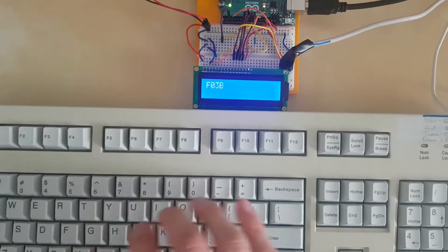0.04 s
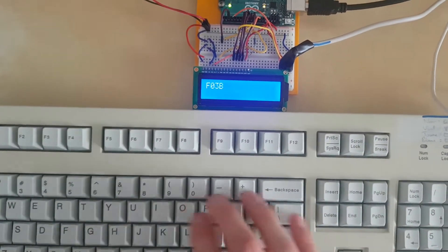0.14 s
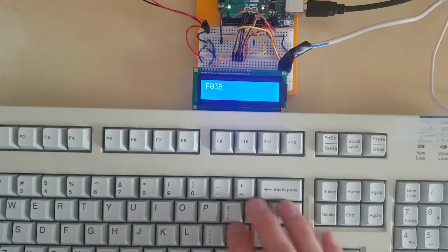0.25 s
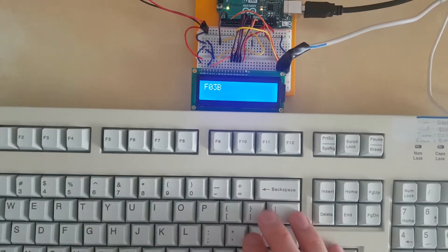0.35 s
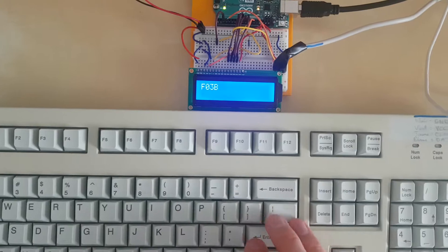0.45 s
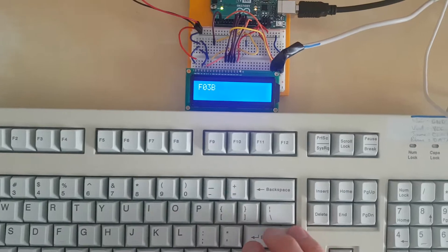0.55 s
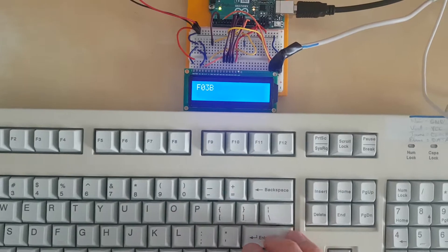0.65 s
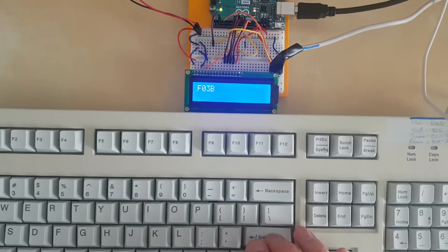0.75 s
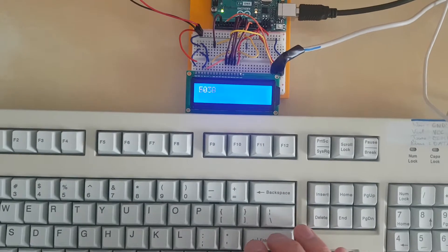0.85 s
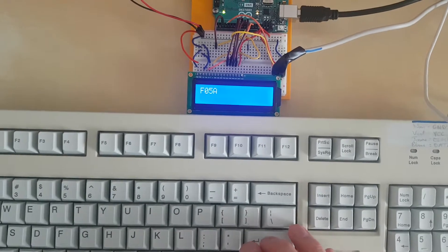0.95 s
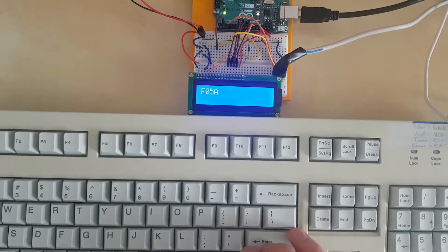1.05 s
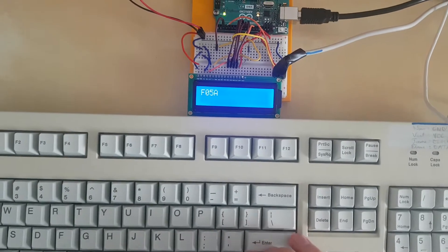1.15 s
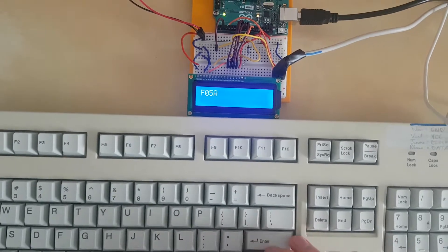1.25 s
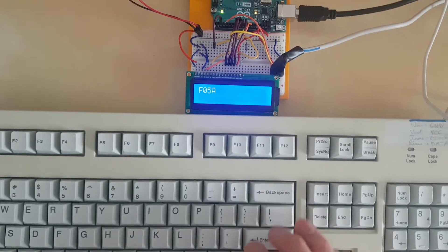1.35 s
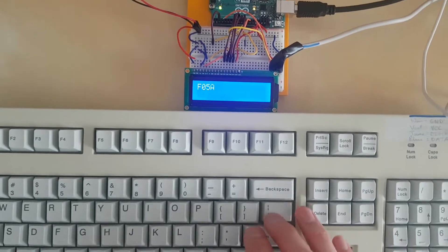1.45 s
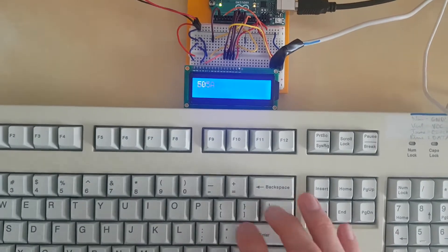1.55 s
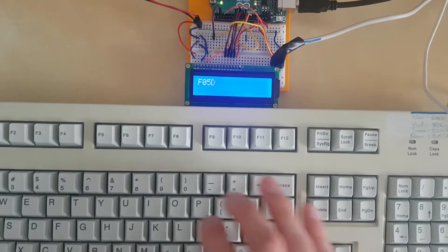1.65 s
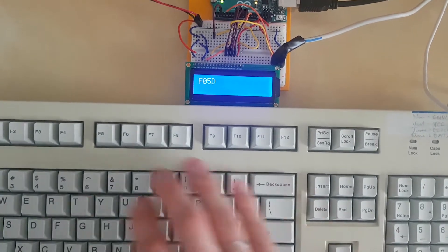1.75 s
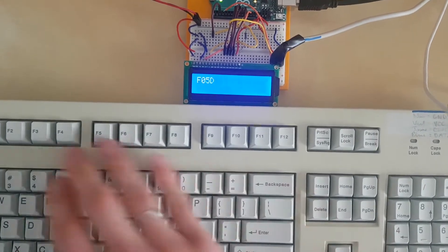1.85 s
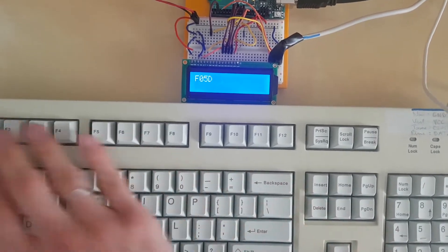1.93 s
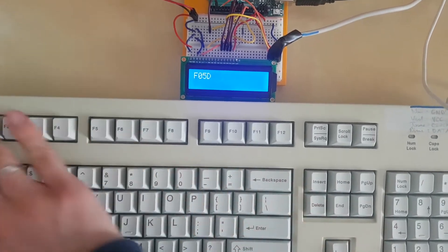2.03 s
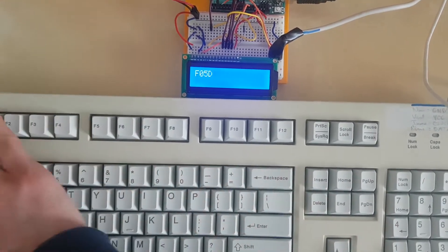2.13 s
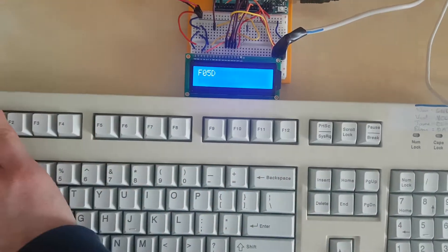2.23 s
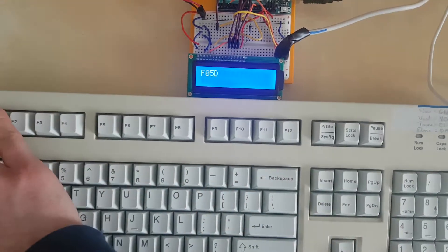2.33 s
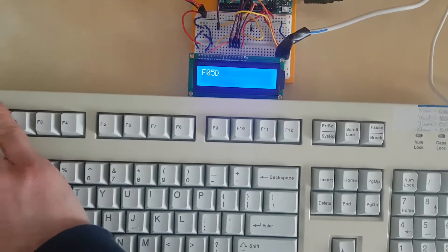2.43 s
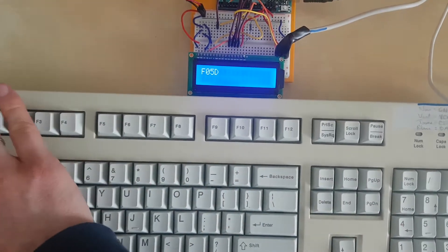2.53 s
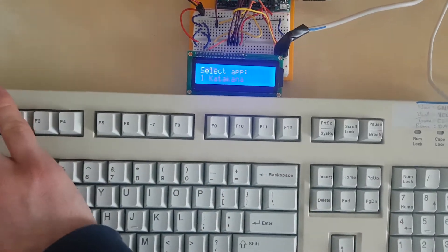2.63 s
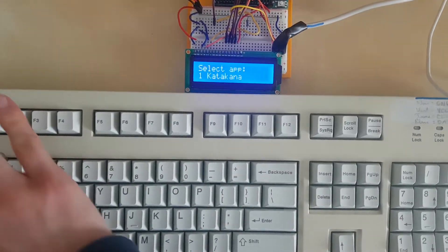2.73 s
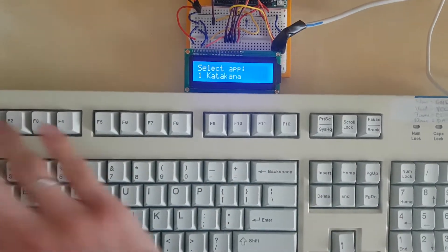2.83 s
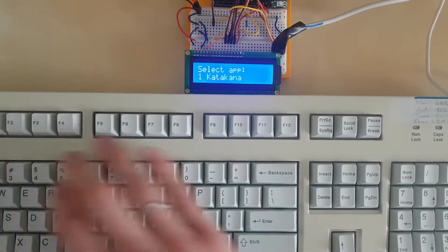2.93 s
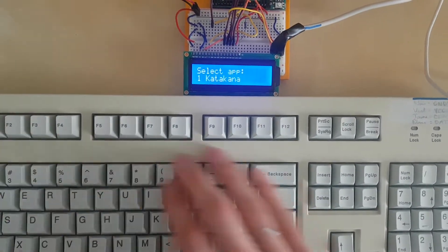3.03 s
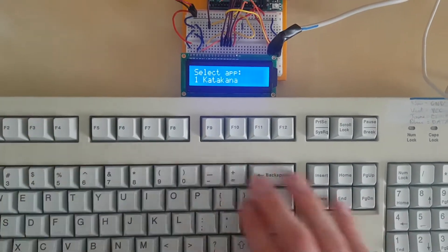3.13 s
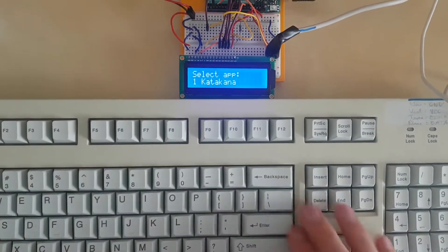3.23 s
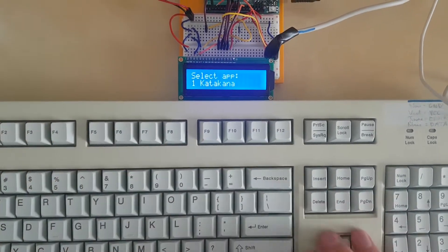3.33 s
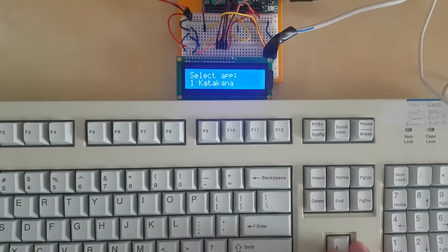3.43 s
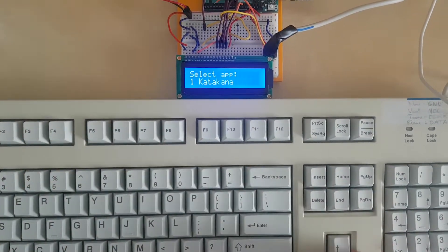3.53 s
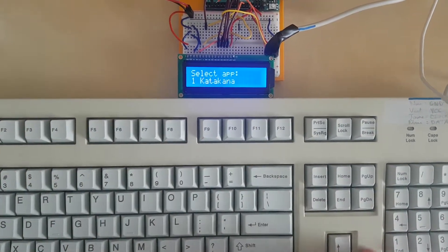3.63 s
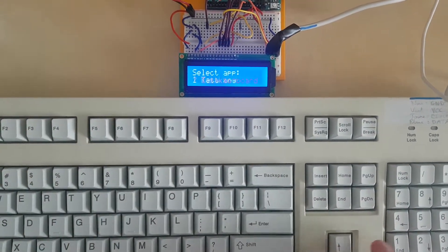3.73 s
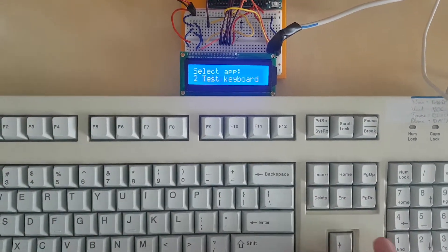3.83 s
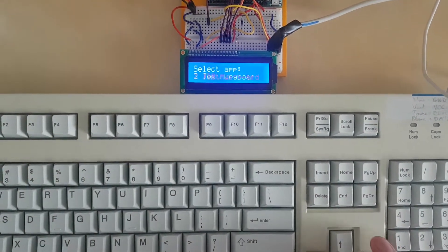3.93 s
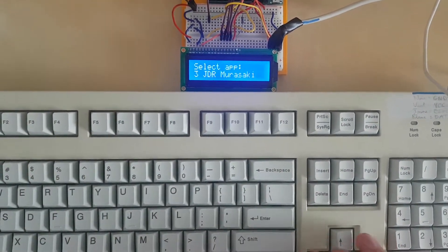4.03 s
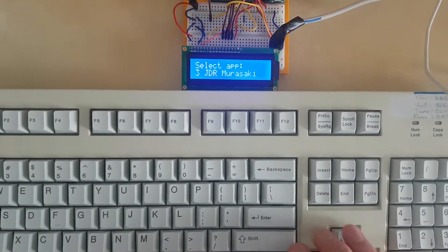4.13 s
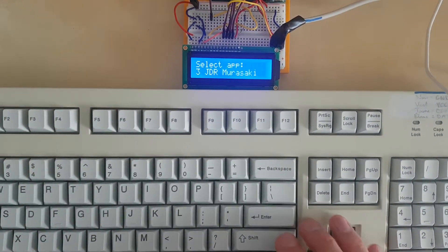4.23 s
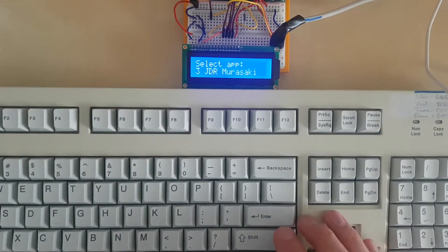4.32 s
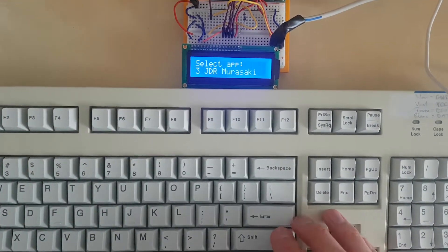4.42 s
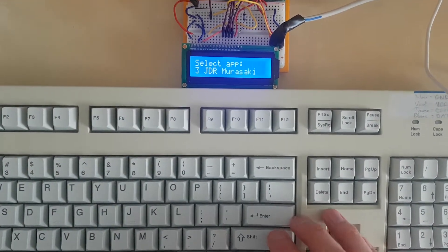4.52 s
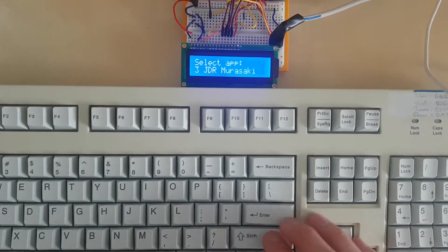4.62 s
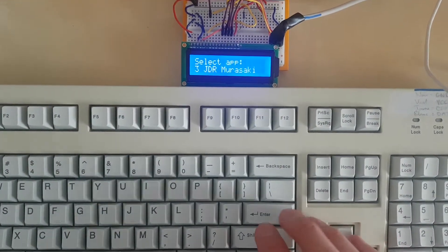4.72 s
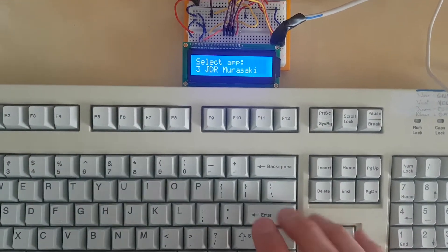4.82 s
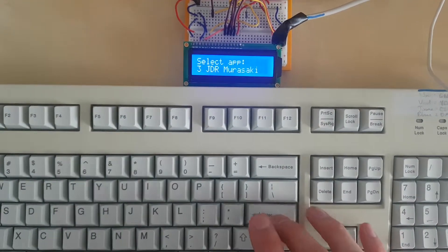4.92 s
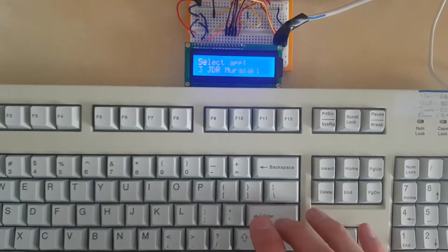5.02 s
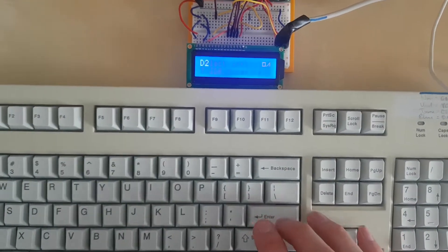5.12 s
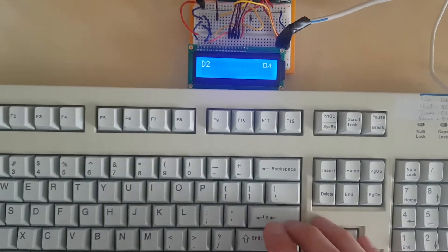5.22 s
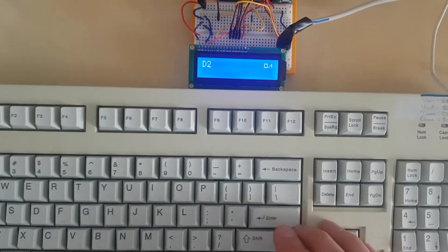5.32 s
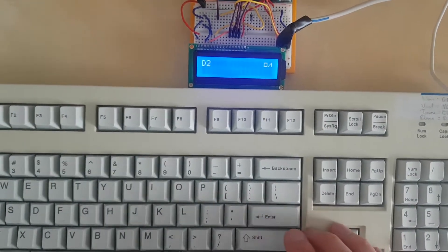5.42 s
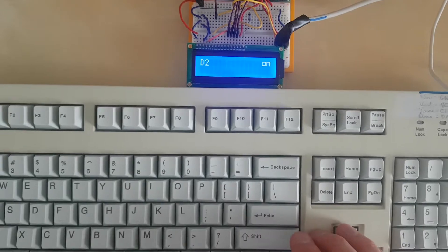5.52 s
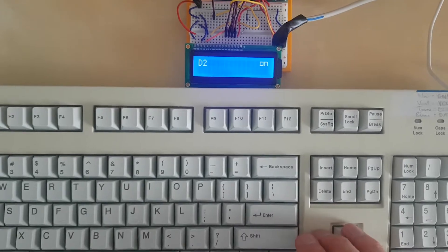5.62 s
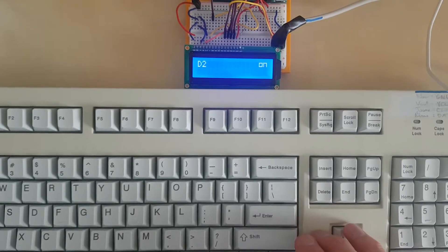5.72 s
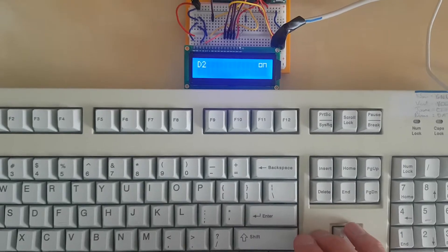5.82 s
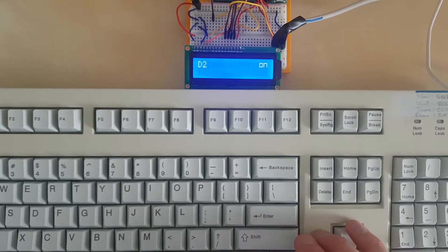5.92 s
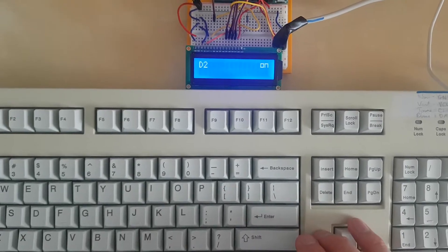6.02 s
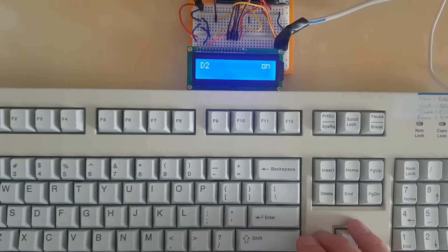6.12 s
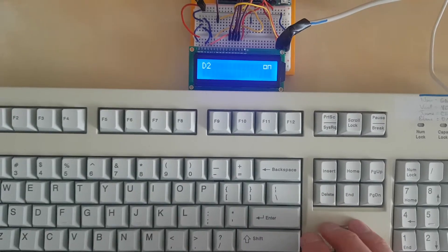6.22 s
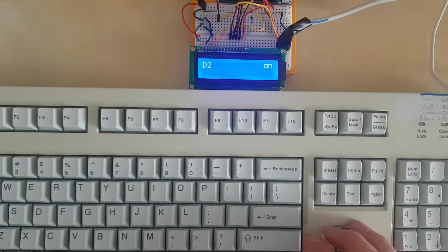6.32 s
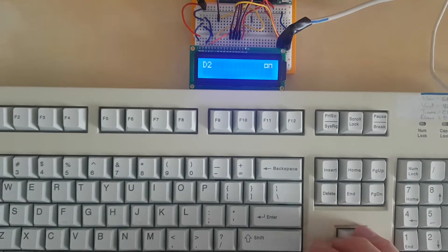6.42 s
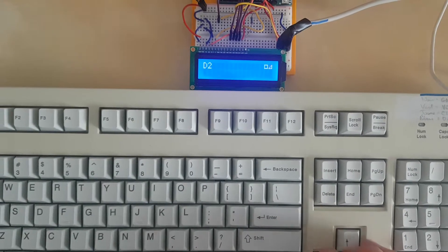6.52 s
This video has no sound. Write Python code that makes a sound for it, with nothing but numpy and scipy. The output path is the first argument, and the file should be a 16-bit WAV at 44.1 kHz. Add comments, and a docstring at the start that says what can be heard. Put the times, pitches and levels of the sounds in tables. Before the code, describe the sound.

A quiet small room with soft air, hiss and a barely audible low hum; a big plastic keyboard on a wooden desk, miked closely in stereo, leaning left. From 0.15 to 0.4 s fingertips brush and patter across caps. A soft press at 0.73 clacks back at 0.84. Small rubs lead to two quick clicks at 1.34 and 1.45, with a bright springy release at 1.56. Near silence, faint touches, then a firm press at 2.5 and release at 2.6. From 3.0 to 3.36 a hand sweeps the keys in a dense, bright rattling clatter. Sharp presses at 3.67 and 3.87 each release about 0.1 s later. After a lull and a light tap at 4.6, the loudest, deepest clunk comes at 4.89, with wire rattle and a clack at 4.98. Light taps at 5.2-5.4, then very faint touches and a soft desk knock around 6.0-6.5.

```python
"""A small quiet room: a full-size plastic computer keyboard on a wooden desk, heard by a close stereo microphone.
Keys are pressed singly, caps are tapped, and a hand sweeps quickly over them. A press strikes the cap,
bottoms out, bounces and thumps the desk; a release clicks and clacks.
Each contact is decaying modes and noise bursts of case and cap, brighter if hard. Filtered noise makes fingertips
brush and springs ring; loose parts rattle. Reflections, room air, hiss and a faint hum surround them."""
import sys
import numpy as np
from scipy import signal
from scipy.fft import rfft, irfft, next_fast_len
from scipy.io import wavfile
from scipy.ndimage import uniform_filter1d

SR = 44100
rng = np.random.default_rng(int(sys.argv[2]) if len(sys.argv) > 2 else 0)


def waveform_to_disk(signal):
    """Save audio, clipped to [-1, 1], as 16-bit WAV at the path in sys.argv[1]."""
    frames = np.transpose(np.atleast_2d(signal))
    scaled = np.clip(frames, -1, 1) * 32767
    samples = np.round(scaled).astype(np.int16)
    wavfile.write(sys.argv[1], SR, samples)


N = 289296
TOP_HZ = 16100  # upper limit of the sound
LEAD_S = .012  # time a stem slides before it strikes


def undb(db):
    """Level: decibels to amplitude gain."""
    return 10 ** (np.asarray(db) / 20)


def seconds(length):
    """Sampling: the time axis of that length in seconds."""
    return np.arange(int(length * SR)) / SR


def fade(t, t60):
    """Exponential damping: a decay by 60 dB in t60 seconds."""
    return np.exp(-np.log(1000) * t / t60)


def unit(x):
    """Normalization: scale to rms 1."""
    return x / np.sqrt(np.mean(x ** 2))


def blow(x, db, span=.01):
    """Equal energy: scale a stereo hit to the energy of that level held for span seconds."""
    return x * undb(db) / np.sqrt(np.sum(x ** 2) / (2 * span * SR))


def add(out, start, x):
    """Superposition: mix a stereo sound in at a start time."""
    i = max(int(start * SR), 0)
    out[:, i:i + x.shape[1]] += x[:, :N - i]


def low_cut(x, hz):
    """Bass attenuation: a second-order high-pass."""
    return signal.sosfilt(signal.butter(2, hz, "highpass", fs=SR, output="sos"), x)


def resonance(x, hz, width_hz):
    """Resonance: one narrow band responds to the sound; rms 1."""
    return unit(signal.lfilter(*signal.iirpeak(hz, hz / width_hz, fs=SR), x))


def noise(n, points, apart_hz):
    """Coherence: coloured stereo noise, alike in the bass and growing apart above apart_hz."""
    size = next_fast_len(n)
    f = np.fft.rfftfreq(size, 1 / SR) + 1
    hz, db = np.transpose(points)
    mid, side = rfft(rng.standard_normal((2, size)))
    both = mid + np.array([[1], [-1]]) * side * f / (f + apart_hz)
    colour = undb(np.interp(np.log(f), np.log(hz), db))
    return unit(irfft(both * colour, size)[:, :n])


def ring(modes, t, scatter_db, detune, apart_hz):
    """Modal synthesis: damped sines, weighted anew for each blow, high ones out of step between channels."""
    hz, db, t60 = np.transpose(modes)[:, :, None]
    pitch, weight, sign, lag = rng.standard_normal((4, len(hz), 1))
    turn = 2 * np.pi * hz * (1 + detune * pitch) * t
    size = np.sign(sign) * undb(db + scatter_db * weight) * fade(t, t60)
    skew = lag * hz / (hz + apart_hz)
    return np.array([np.sum(size * np.sin(turn + side * skew), axis=0) for side in (1, -1)])


# spectrum of room air and hiss: frequency_hz, relative_density_db
AIR_SPECTRUM = [(20, -41), (45, -1.5), (60, -1.5), (130, -6), (170, -5), (250, -1), (500, -6.5),
                (1000, -7.5), (2000, -12.5), (4000, -22), (6500, -27), (10000, -30), (13500, -24),
                (16000, -26)]
# faint hum: pitch_hz, level_db
HUM_TONES = [(118.6, -79), (237, -83.5)]


def background():
    """Stationary noise and steady tones: still room air, microphone hiss and a low hum."""
    t = np.arange(N) / SR
    hum = 0
    for hz, db in HUM_TONES:
        hum = hum + np.sqrt(2) * undb(db) * np.sin(2 * np.pi * (hz * t + rng.random()))
    return noise(N, AIR_SPECTRUM, apart_hz=800) * undb(-65.5) + hum


# spectrum of the room's reflections: frequency_hz, relative_density_db
ROOM_SPECTRUM = [(60, 15), (300, 7.5), (800, -0.5), (1300, 3), (3200, -1), (5000, -4), (8000, -0.5),
                 (16000, -2.5)]


def room(x, wet_db, t60, early_db, early_t60):
    """Reverberation: quick reflections from desk and nearby things, then a small room's diffuse tail."""
    t = seconds(.7)
    early_rise = 1 - np.exp(-(t / 0.01) ** 2)
    early = noise(len(t), ROOM_SPECTRUM, apart_hz=700) * fade(t, early_t60) * early_rise
    late_rise = 1 - np.exp(-(t / 0.026) ** 2)
    late = noise(len(t), ROOM_SPECTRUM, apart_hz=400) * fade(t, t60) * late_rise
    # a span of one sample sets the total energy of the echo
    echo = blow(early, early_db, span=1 / SR) + blow(late, wet_db, span=1 / SR)
    return signal.fftconvolve(x, echo, axes=1)[:, :N]


def lean_left(x, db, above_hz):
    """Acoustic shading: the left port faces the keys; the right is shaded, less so in the bass."""
    f = np.fft.rfftfreq(2 * N, 1 / SR)
    shade_db = db * f / (f + above_hz)
    gains = undb(np.array([shade_db, -shade_db]) / 2)
    gains = gains / np.sqrt(np.mean(gains ** 2, axis=0))
    return irfft(rfft(x, 2 * N) * gains)[:, :N]


# desk top modes, detuned a little per push: pitch_hz, relative_level_db, t60_s
DESK_MODES = [(63.9, -2.5, 0.14), (88.5, -6.5, 0.14), (106.2, -3.5, 0.17), (145, -11, 0.26),
              (180, -3, 0.19), (251, -6, .12), (307.6, -10, 0.097)]
# spectrum of the desk's boom: frequency_hz, relative_density_db
BOOM_SPECTRUM = [(25, -29), (60, 0.5), (130, 5.5), (260, -5.5), (450, -0.5), (900, -30)]


def thump(db, knock_hz, boom_db):
    """Inertia: the heavy desk top takes up a push slowly, with a dull knock and a boom of crowded modes."""
    t = seconds(.5)
    rise = 1 - np.exp(-(t / 0.009) ** 2)
    boom = blow(noise(len(t), BOOM_SPECTRUM, apart_hz=800) * fade(t, 0.27) * rise, boom_db)
    modes = ring(DESK_MODES, t, scatter_db=2.0, detune=0.04, apart_hz=501)
    boom += blow(modes * rise, boom_db - 5.0)
    knock = ring([(knock_hz, 0, .06)], t, scatter_db=0, detune=0, apart_hz=906)
    boom += blow(knock * rise, -4.5)
    return blow(boom, db, span=0.018)


# other soft desk knocks, the heel of the hand or a key release (at 2.604): start_s, level_db, knock_hz
SOFT_KNOCK_EVENTS = [(2.604, -64, 280), (3.04, -64, 445), (6.378, -58.5, 384)]
DESK_LAG_S = .006  # the desk follows a finger strike after this time
PRESS_BOOM_DB, SOFT_BOOM_DB = -1, -12.5  # weight of the boom in the mix with a knock at -4.5 dB


def desk():
    """Structure-borne excitation: every press thumps the desk; a hand or a key release knocks it softly."""
    out = np.zeros((2, N))
    for start, *_, desk_db, knock_hz in PRESS_EVENTS:
        add(out, start + DESK_LAG_S, thump(desk_db, knock_hz, PRESS_BOOM_DB))
    for start, db, knock_hz in SOFT_KNOCK_EVENTS:
        add(out, start, thump(db, knock_hz, SOFT_BOOM_DB))
    return out


# spectrum of rubbing: frequency_hz, relative_density_db
FRICTION_SPECTRUM = [(300, -21), (800, 10), (1800, 2.5), (3500, -1.5), (5200, -5), (7000, -19.5),
                     (10000, -29), (14000, -13.5), (17000, -20)]


def friction(length, rough_db):
    """Stick-slip friction: surfaces catch and slip in small uneven grains."""
    n = int(length * SR)
    grain_gain = undb(rough_db * rng.standard_normal(n // 128 + 1))
    grains = uniform_filter1d(grain_gain.repeat(128), size=96)[:n]
    return unit(noise(n, FRICTION_SPECTRUM, apart_hz=1000) * grains * signal.windows.tukey(n, .5))


# key springs ringing, short pings when a key is struck or let go, long scrapes when it moves slowly:
# start_s, length_s, level_db
SPRING_EVENTS = [(0.181, .26, -68), (1.561, 0.013, -40.5), (3.133, 0.029, -38.5), (3.36, .2, -66),
                 (6.4, 0.12, -74)]
SPRING_HZ, SPRING_WIDTH_HZ = 4970, 370


def springs():
    """Resonance: grainy noise rings the key springs, in short pings or long thin scrapes."""
    out = np.zeros((2, N))
    for start, length, db in SPRING_EVENTS:
        ringing = resonance(friction(length, rough_db=6.0), SPRING_HZ, SPRING_WIDTH_HZ)
        add(out, start, undb(db) * resonance(ringing, SPRING_HZ, 2 * SPRING_WIDTH_HZ))
    return out


# fingertips sliding over the caps; at 4.917 the big key's stabiliser wire rattles:
# start_s, length_s, level_db, squeak_hz
RUB_EVENTS = [(0.161, 0.27, -56.5, 2220), (0.489, 0.079, -59.5, 3400), (1.062, 0.02, -55, 4180),
              (1.08, 0.022, -55, 3770), (1.214, 0.028, -60.5, 1800), (1.256, 0.023, -54, 3300),
              (3.021, 0.23, -48.5, 2440), (3.49, 0.093, -65.5, 1410), (3.736, 0.0066, -51, 1600),
              (4.564, 0.093, -65.5, 3460), (4.917, 0.11, -54, 1250), (5.321, 0.055, -66.5, 3570)]


def rubbing():
    """Friction and resonance: skin on the caps, or once a big key's wire, brushes with a faint squeak."""
    out = np.zeros((2, N))
    for start, length, db, squeak_hz in RUB_EVENTS:
        brush = friction(length, rough_db=3.5)
        squeak = resonance(brush, squeak_hz, squeak_hz / 5)
        add(out, start, undb(db) * unit(brush + 0.71 * squeak))
    return out


RATTLES_PER_S, RATTLE_SCATTER_DB = 18, 5
RATTLE_CASE_DB, RATTLE_HARDNESS, RATTLE_HZ = -1.5, 0.96, 1090  # as for contact()


def rattles():
    """Random impacts: loose caps, or the big key's wire, rattle, on average loudest midway through a row."""
    out = np.zeros((2, N))
    for start, length, rub_db, squeak_hz in RUB_EVENTS:
        count = int(length * RATTLES_PER_S)
        for k in range(count):
            when = start + length * (k + rng.random()) / count
            size_db = rub_db + RATTLE_SCATTER_DB * rng.standard_normal()
            swell_db = 20 * np.log10(np.sin(np.pi * (when - start) / length))
            hit = contact(size_db + swell_db, RATTLE_CASE_DB, RATTLE_HARDNESS, RATTLE_HZ, squeak_hz)
            add(out, when - LEAD_S, hit)
    return out


def chatter(x, spread_s, bounce, count):
    """Multiple impact: the loose stem hits its guide several times within a few milliseconds."""
    out = x.copy()
    for k in range(count):
        lag = 1 + int((k + rng.random()) / count * spread_s * SR)
        out[:, lag:] += bounce * rng.standard_normal() * x[:, :-lag]
    return out


# plastic case modes, detuned a little per hit: pitch_hz, relative_level_db, t60_s
CASE_MODES = [(475, -12, 0.039), (650, -10.5, 0.11), (714.4, -2.5, 0.068), (773, -4, 0.0282),
              (900, 4, 0.014), (967, 1.5, 0.041), (1094, 3.5, 0.039), (1230, 6, 0.015), (1370, -5.5, 0.046)]
# keycap and stem modes, detuned a little per hit: pitch_hz, relative_level_db, t60_s
CAP_MODES = [(1610, 5.5, 0.011), (1752, -0.5, 0.046), (1867, 4, 0.0057), (1999, 3, 0.024),
             (2364, 3.5, 0.0099), (2474, 3, 0.019), (2880, -0.5, 0.034), (3090, -11, 0.027),
             (3398, -1.5, 0.034), (3930, -17, 0.028), (3860, -21, 0.022), (5050, -2.5, 0.026),
             (5650, -20, 0.0067)]
# spectrum of the hollow case knock: frequency_hz, relative_density_db
KNOCK_SPECTRUM = [(150, -26.5), (400, -6), (560, -9), (750, 1.5), (1300, -1), (1600, -7.5), (3000, -47)]
# spectrum of the cap's clack: frequency_hz, relative_density_db
CLACK_SPECTRUM = [(900, -29.5), (1500, 6), (2400, 1), (3500, 1.5), (5200, -5.5), (6300, -30), (8000, -37),
                  (12000, -48)]
# spectrum of ticking plastic edges: frequency_hz, relative_density_db
TICK_SPECTRUM = [(3000, -1.5), (6000, 4.5), (7500, -3.5), (9500, -7), (12500, -0.5), (15000, 3),
                 (17000, -15.5)]


def key(case_db, cap_db, tick_db, case_hz, cap_hz):
    """Impact excitation: a hollow knock of the case, the clack of the cap, the tick of hard edges."""
    t = seconds(.08)
    rise = 1 - np.exp(-t / 0.00046)
    case = blow(ring(CASE_MODES, t, scatter_db=2.5, detune=0.015, apart_hz=1800), 0)
    case += blow(ring([(case_hz, 0, .03)], t, scatter_db=0, detune=0, apart_hz=2920), 0.37)
    case += blow(noise(len(t), KNOCK_SPECTRUM, apart_hz=1200) * fade(t, 0.035), -1.2)
    # the shell takes a moment to get moving and radiates little bass
    case = low_cut(case * (1 - np.exp(-t / 0.00063)), hz=368)
    cap_modes = ring(CAP_MODES, t, scatter_db=2.5, detune=0.035, apart_hz=600)
    cap = blow(chatter(cap_modes, spread_s=.003, bounce=0.97, count=3), 0)
    cap += blow(ring([(cap_hz, 0, .016)], t, scatter_db=0, detune=0, apart_hz=1000), 0.46)
    # countless weaker modes merge into a short crack
    cap += blow(noise(len(t), CLACK_SPECTRUM, apart_hz=580) * rise * fade(t, 0.026), 0.96)
    tick = noise(len(t), TICK_SPECTRUM, apart_hz=1000) * rise * fade(t, .021)
    return blow(case, case_db) + blow(cap * rise, cap_db) + blow(tick, tick_db)


def slide(cap_db, tick_db):
    """Sliding friction: the stem rubs down its guide, louder and louder, just before it strikes."""
    t = seconds(LEAD_S)
    swell = fade(t, 0.014)[::-1]
    rub = blow(noise(len(t), FRICTION_SPECTRUM, apart_hz=1010) * swell, cap_db - 15.0)
    return rub + blow(noise(len(t), TICK_SPECTRUM, apart_hz=1500) * swell, tick_db - 19.0)


# hardness runs from 0 (finger pad) to 1 (fingernail)
PAD_TICK_DB, NAIL_TICK_DB = -31.5, -3  # tick relative to the cap
PAD_CORNER_HZ, NAIL_OCTAVES = 5020, 1.7  # low-pass corner for a pad, its rise up to a nail
CASE_OFFSET_DB = 1.24  # added to every case_db, which weighs case against cap


def contact(db, case_db, hardness, case_hz, cap_hz):
    """Contact time: soft contacts last longer and sound duller; hard ones are bright and tick more."""
    tick_db = db + PAD_TICK_DB + hardness * (NAIL_TICK_DB - PAD_TICK_DB)
    strike = key(db + case_db + CASE_OFFSET_DB, db, tick_db, case_hz, cap_hz)
    hit = np.hstack([slide(db, tick_db), strike])
    corner_hz = min(PAD_CORNER_HZ * 2 ** (NAIL_OCTAVES * hardness), TOP_HZ)
    return signal.lfilter(*signal.butter(1, corner_hz, fs=SR), hit)


# fingers knocking caps, and sometimes first touching one just before pressing it,
# thickest as the hand sweeps across; levels before the low-pass:
# start_s, level_db, case_db (weight against the cap, before the offset), hardness (0-1), case_hz, cap_hz
TAP_EVENTS = [(.149, -36.5, -11, 0.99, 920, 2420), (0.1607, -37.5, -1.5, 0.96, 1050, 2950),
              (.222, -38.5, -7.5, 0.84, 1100, 1800), (.279, -46, -6, .82, 1060, 3400),
              (.2953, -40, -7.5, 0.66, 770, 1710), (.36, -47, -5.5, 0.66, 800, 1700),
              (.5, -50, -4.5, 0, 890, 1670), (.721, -52.5, 2, 0.2, 800, 2180),
              (1.003, -57.5, -6, 0.66, 770, 4030), (1.28, -47, -6, 1., 814, 3150),
              (1.3281, -42.5, -11, .05, 905, 1670), (1.932, -61.5, 5, 0.4, 795, 1700),
              (2.292, -55.5, -7.5, 0.1, 945, 2600), (2.449, -60, 3.5, 0.55, 920, 3380),
              (3.014, -41.5, 2, 0.91, 1004, 2520), (3.039, -33, -5.5, 0.92, 970, 2530),
              (3.0652, -37, 0.5, 0.86, 736, 2570), (3.081, -37.5, -4.5, 0.84, 934, 5100),
              (3.112, -38.5, -6, 0.7, 1110, 2340), (3.123, -42, -2.5, 1., 1070, 2460),
              (3.1404, -36, -12, .97, 940, 5280), (3.163, -43.5, -5, 1, 930, 4330),
              (3.197, -41, -4, 0.93, 1350, 3200), (3.218, -41.5, -3.5, 0.8, 1360, 4130),
              (3.246, -37.5, -7, 0.85, 1390, 4910), (3.26, -35, -6, 0.82, 1060, 3740),
              (3.2868, -40.5, -2.5, 0.4, 816, 2100), (3.362, -39.5, -9, 0.74, 1064, 1620),
              (3.505, -53.5, -3, .53, 1260, 5000), (3.519, -53, -4, 0.3, 1380, 1930),
              (3.594, -54, -7, 0.7, 1500, 5080), (4.434, -58.5, 1, 0.4, 740, 2150),
              (4.62, -46.5, -4.5, 0.5, 1366, 2210), (5.2365, -46.5, -2, .05, 805, 2030),
              (5.379, -42.5, -1, 0.33, 764, 2330), (5.4276, -43.5, -12, 0.62, 1420, 1940),
              (5.998, -58, 3, .5, 1487, 1980), (6.336, -59.5, -6, 0.66, 1490, 2000),
              (6.422, -55, -8, 0.68, 800, 2060), (6.476, -60, -8, .45, 710, 2140)]


def taps():
    """Single impact: each knock or first touch of a finger on a cap is one contact."""
    out = np.zeros((2, N))
    for start, db, case_db, hardness, case_hz, cap_hz in TAP_EVENTS:
        add(out, start - LEAD_S, contact(db, case_db, hardness, case_hz, cap_hz))
    return out


# keys let go, the switch unlatching before the stem hits its stop; levels before the low-pass:
# start_s (stop), unlatch_db, stop_db, hardness (of the stop, 0-1), case_hz, cap_hz
RELEASE_EVENTS = [(0.8424, -48.5, -40.5, 0.69, 950, 1980), (1.5632, -59, -34.5, 0.86, 1195, 3930),
                  (2.613, -48, -37.5, 0.64, 877, 2350), (3.758, -56, -30.5, 0.73, 894, 4650),
                  (3.9702, -63, -35, 0.69, 1013, 1670), (4.975, -51, -37, .48, 717, 2050)]
UNLATCH_S, UNLATCH_HARDNESS = .0095, 0.63  # lead of the unlatching over the stop
RELEASE_CASE_DB = -1


def releases():
    """Stored energy let go: the switch unlatches with a click, then the stem clacks on its stop."""
    out = np.zeros((2, N))
    for start, unlatch_db, stop_db, hardness, case_hz, cap_hz in RELEASE_EVENTS:
        lead = start - LEAD_S
        click = contact(unlatch_db, RELEASE_CASE_DB, UNLATCH_HARDNESS, case_hz, cap_hz)
        add(out, lead - UNLATCH_S, click)
        add(out, lead, contact(stop_db, RELEASE_CASE_DB, hardness, case_hz, cap_hz))
    return out


# key presses, strike and bottom levels before the low-pass: start_s, travel_s (down to the key bed),
# strike_db, bottom_db, hardness (of the finger, 0-1), case_hz, cap_hz, desk_db, desk_knock_hz
PRESS_EVENTS = [(0.7297, 0.015, -43, -46.5, 0, 727, 1900, -53, 260),
                (1.337, .0052, -35.5, -36.5, 0.67, 748, 1590, -60, 304),
                (1.454, .011, -37.5, -51, 0.74, 1440, 1420, -55.5, 383),
                (2.512, 0.0064, -38, -40.5, 0.92, 886, 2300, -47, 268),
                (3.671, .008, -29, -49, 0.71, 1062, 4850, -52.5, 195),
                (3.8675, 0.022, -29, -40, 0.77, 893, 2095, -49, 287),
                (4.8854, .0041, -25, -24.5, 0.56, 893, 1686, -41, 148)]
STRIKE_CASE_DB, BOTTOM_CASE_DB, BOTTOM_HARDNESS = -11.5, 3, 0.69
REBOUND_S, REBOUND_DB, REBOUND_HZ = .0128, -9.5, 730  # delay and level after bottoming out, case note


def presses():
    """Successive impacts: a bright strike, a hollow bottoming out and one bounce on the key bed."""
    out = np.zeros((2, N))
    for start, travel, strike_db, bottom_db, hardness, case_hz, cap_hz, _, _ in PRESS_EVENTS:
        lead = start - LEAD_S
        add(out, lead, contact(strike_db, STRIKE_CASE_DB, hardness, case_hz, cap_hz))
        bottom = contact(bottom_db, BOTTOM_CASE_DB, BOTTOM_HARDNESS, case_hz, cap_hz)
        add(out, lead + travel, bottom)
        rebound_db = bottom_db + REBOUND_DB
        rebound = contact(rebound_db, BOTTOM_CASE_DB, BOTTOM_HARDNESS, REBOUND_HZ, cap_hz)
        add(out, lead + travel + REBOUND_S, rebound)
    return out


def scene():
    """Superposition: desk, rubbing, springs and keys with their echo, over the quiet of the room."""
    keyboard = presses() + releases() + taps()
    direct = keyboard + desk() + rattles() + rubbing() + springs()
    walls = room(direct, wet_db=-15.5, t60=0.5, early_db=-12.5, early_t60=0.054)
    return lean_left(direct + walls, db=8.5, above_hz=950) + background()


def record(dry):
    """Band limiting: the recorder drops the deepest rumble and cuts the top."""
    top_cut = signal.ellip(8, .2, 70, TOP_HZ, fs=SR, output="sos")
    return signal.sosfilt(top_cut, low_cut(dry, hz=35))


dry = scene()
out = record(dry)
waveform_to_disk(out)
```